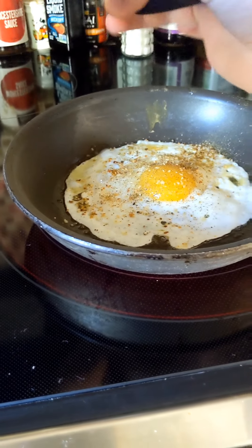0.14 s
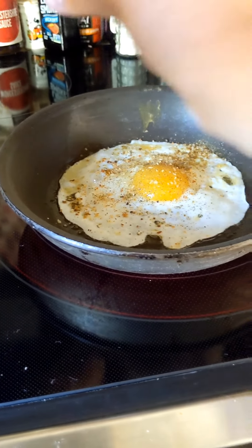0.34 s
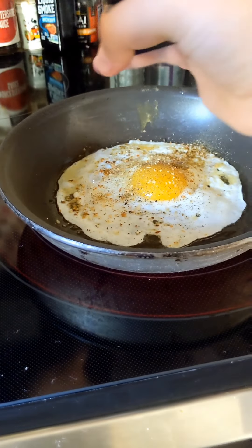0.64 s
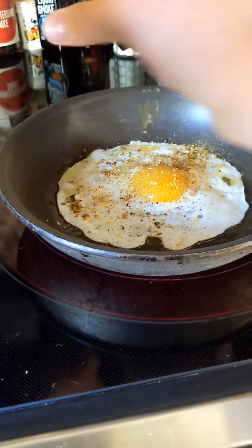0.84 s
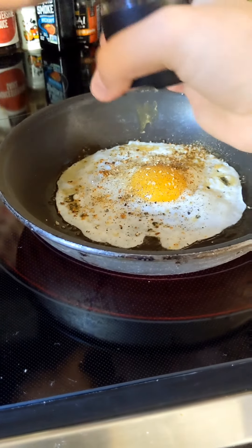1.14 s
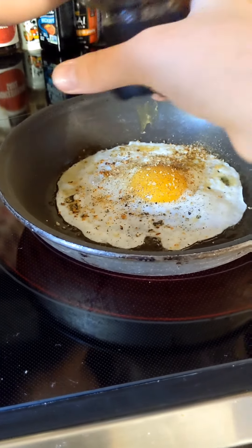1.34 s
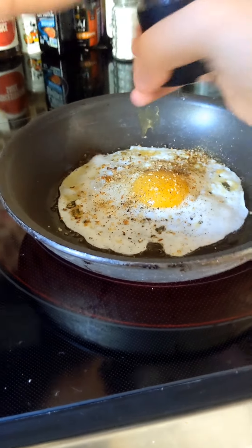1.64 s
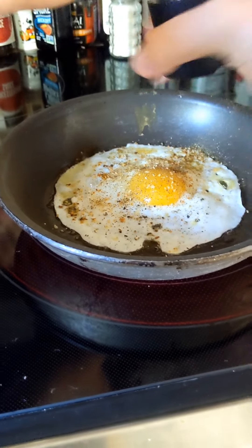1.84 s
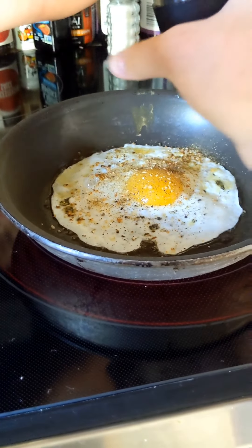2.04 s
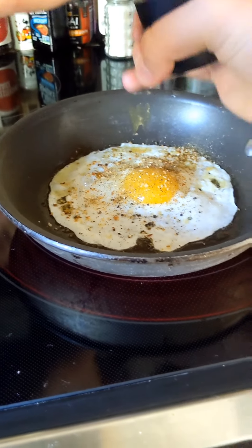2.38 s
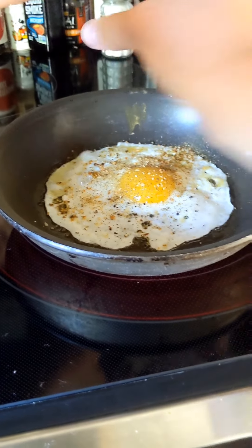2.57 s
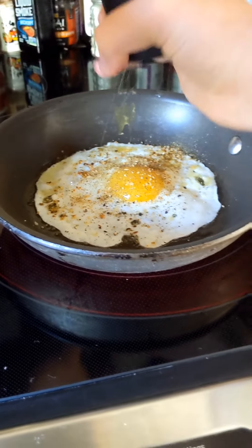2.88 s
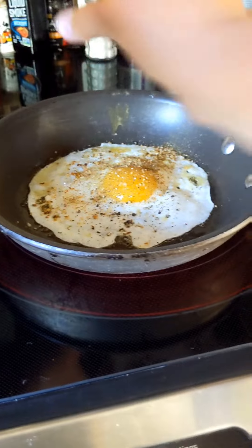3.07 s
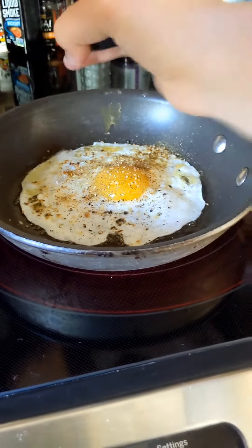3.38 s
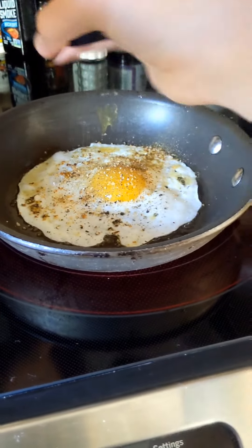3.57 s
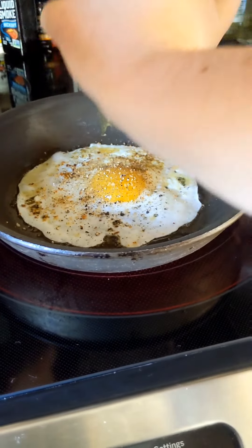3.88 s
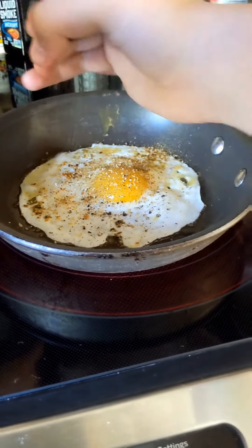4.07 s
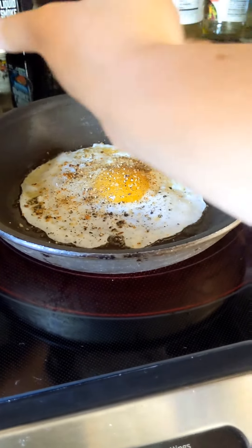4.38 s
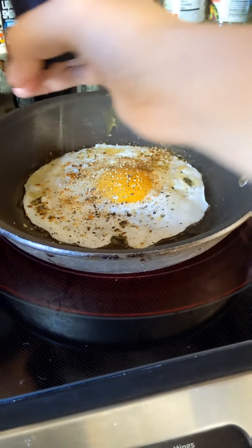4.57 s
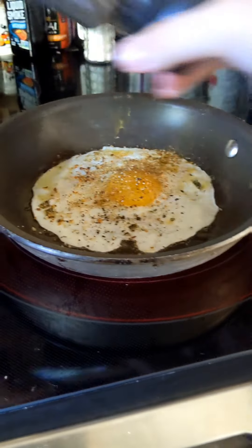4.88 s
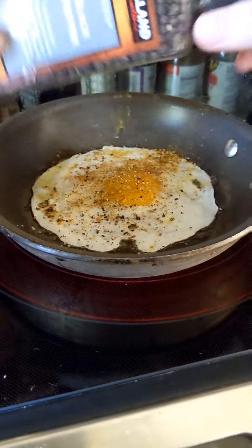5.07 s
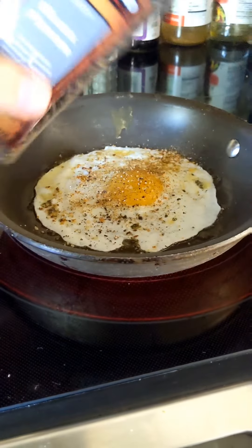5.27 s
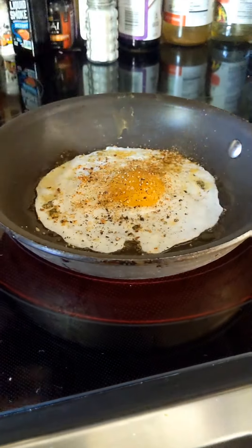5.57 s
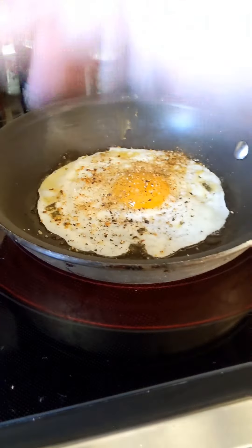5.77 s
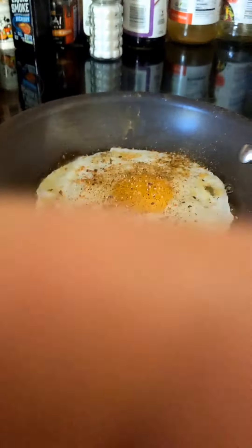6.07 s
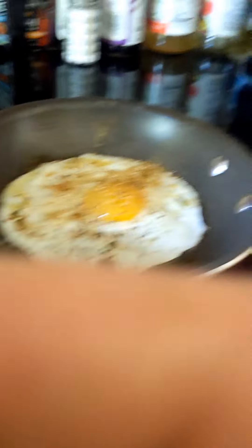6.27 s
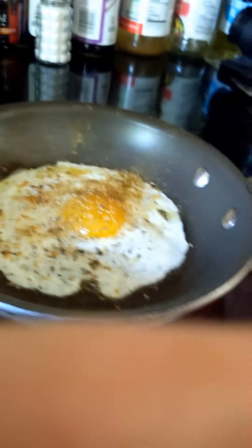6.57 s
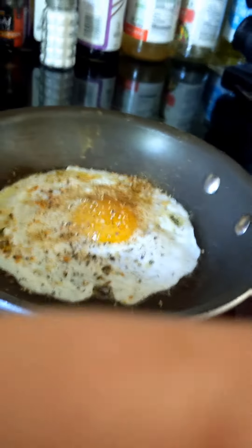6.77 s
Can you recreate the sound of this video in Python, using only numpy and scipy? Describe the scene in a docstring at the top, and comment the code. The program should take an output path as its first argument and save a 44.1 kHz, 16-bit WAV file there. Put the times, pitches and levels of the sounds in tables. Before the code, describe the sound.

A hand pepper mill crunches and cracks in short close twists over a faintly sizzling pan, then peppercorns rattle and things knock on the counter.

```python
"""In a kitchen, a hand pepper mill is twisted over an egg in a pan, close to a phone that listens through two ports.
Corns crack (noise bursts through the body's resonances), crunch (noise and tuned taps) and slide as the mill tips.
A loose steel part clinks as damped modes, and things set down on the counter ring its modes over a low shuffle.
Behind them lie the oil's faint grainy sizzle, low rumble and mains hum.
The right port is muffled and farther from the pan; two sharp snaps come from close beside it."""
import sys
import numpy as np
from scipy import signal
from scipy.fft import rfft, irfft, next_fast_len
from scipy.io import wavfile
from scipy.ndimage import uniform_filter1d

SR = 44100
rng = np.random.default_rng(int(sys.argv[2]) if len(sys.argv) > 2 else 0)


def dump_mix(stems):
    """Bounce the given channels to the path in sys.argv[1] as a 16-bit WAV at rate SR."""
    frames = np.atleast_2d(stems).T  # one column per channel
    limited = np.clip(frames, -1, 1)  # hard clip at full scale
    pcm = np.round(limited * 32767).astype(np.int16)
    wavfile.write(sys.argv[1], SR, pcm)


N = 305418  # length [samples]


def amp(db):
    """Decibels to a linear factor."""
    return 10 ** (np.asarray(db) / 20)


def unit(x):
    """x scaled to rms 1."""
    return x / np.sqrt(np.mean(x ** 2) + 1e-20)


def along(points, hz):
    """Reads (frequency [Hz], value) points on a log frequency axis."""
    f, value = np.transpose(points)
    return np.interp(np.log(hz + 1), np.log(f + 1), value)


def curve(rows):
    """A linear level per sample from (time [s], level [dB]) rows, nearly silent before the first."""
    s, db = np.transpose(rows)
    return amp(np.interp(np.arange(N) / SR, s, db, left=-120))


def add(out, s, sound):
    """Mixes a sound in at time s [s]."""
    part = out[..., max(round(s * SR), 0):][..., :sound.shape[-1]]
    part += sound[..., :part.shape[-1]]


def filtered(x, response):
    """x times a complex response of frequency."""
    m = next_fast_len(x.shape[-1] + 8192)
    spectrum = rfft(x, m) * response(np.fft.rfftfreq(m, 1 / SR))
    return irfft(spectrum, m)[..., :x.shape[-1]]


def coloured(x, spectrum):
    """x shaped by (frequency [Hz], level [dB]) points, rms 1."""
    return unit(filtered(x, lambda hz: amp(along(spectrum, hz))))


def tilted(x, slope_db):
    """A moving brightness: octave bands around 2 kHz get slope_db per octave."""
    steps = np.arange(-3, 4)[:, None]

    def band_weights(hz):
        octave = np.log2(np.clip(hz, 250, 16000) / 2000)
        return np.clip(1 - abs(octave - steps), 0, 1)

    bands = filtered(x, band_weights)
    return np.sum(amp(steps * slope_db) * bands, axis=0)


def patchy(x, depth_db):
    """x with slowly drifting patches of gain over pitch and time."""
    z = signal.stft(x, nperseg=512)[2]
    field = uniform_filter1d(rng.standard_normal(z.shape), size=30, axis=0)
    field = uniform_filter1d(field, size=50, axis=1)
    return signal.istft(z * amp(depth_db * unit(field)), nperseg=512)[1][:N]


def grains(rate, spread_db, hiss, life):
    """Random puffs, rate per second and of varied size, each decaying over life [s], on a bed of noise."""
    size = amp(spread_db * np.minimum(rng.exponential(size=N), 2.5))
    starts = (rng.random(N) < rate / SR) * size
    puffs = signal.lfilter([1], [1, -np.exp(-1 / (life * SR))], starts)
    return unit(puffs * rng.standard_normal(N)) + hiss * rng.standard_normal(N)


def ring(modes, seconds, attack, scatter_db):
    """Damped modes (frequency [Hz], level [dB], t60 [s]) at random phases, their strengths scattered."""
    t = np.arange(int(seconds * SR)) / SR
    total = 0
    for hz, db, t60 in modes:
        decay = amp(db + scatter_db * rng.normal() - 60 * t / t60)
        total = total + decay * np.sin(2 * np.pi * (hz * t + rng.random()))
    return (1 - np.exp(-t / attack)) * total


def taps(modes, rate, spread_db):
    """Tiny knocks at random, each ringing one of the modes; rate per second for each mode."""
    size = amp(spread_db * np.minimum(rng.exponential(size=(len(modes), N)), 2.5))
    blows = (rng.random((len(modes), N)) < rate / SR) * size
    total = 0
    for mode_blows, mode in zip(blows, modes):
        total = total + signal.fftconvolve(mode_blows, ring([mode], 0.02, 0.0003, scatter_db=0))[:N]
    return unit(total)


def resonance(f, centre, width):
    """Band-pass response of one resonance, 1 at its centre [Hz]."""
    return 1j * f * width / (centre * centre - f * f + 1j * f * width)


# what the covered right port lets through: (frequency [Hz], gain [dB])
RIGHT_PORT_GAIN = [(100, -0.5), (300, 1.5), (700, 4), (1100, 4), (2000, -2), (3000, -8), (5000, -14.5),
                   (8000, -25.5), (16000, -31)]


def muffled(x, lag):
    """The covered right port dulls a sound that reaches it lag [s] late."""
    return filtered(x, lambda f: amp(along(RIGHT_PORT_GAIN, f)) * np.exp(-2j * np.pi * f * lag))


# how long the kitchen rings on: (frequency [Hz], t60 [s])
KITCHEN_DECAY = [(200, 0.047), (2000, 0.091), (10000, 0.082)]


def ports(x, lag, wet_db):
    """Each port hears the source and its own diffuse echoes, redrawn every 1/16 s; the right is late and muffled."""
    step, length = SR // 16, SR // 10  # samples between new echo patterns, samples in each
    pieces = np.pad(x, (60, -(N + 60) % step)).reshape(-1, step)  # echoes start 60 samples late
    noise = rng.standard_normal((2, len(pieces), length))
    hz, t, z = signal.stft(noise, SR, nperseg=256)
    decay = amp(-60 * t / along(KITCHEN_DECAY, hz)[:, None])
    tails = signal.istft(z * decay, SR, nperseg=256)[1][..., :length]
    tails = tails / np.linalg.norm(tails, axis=-1, keepdims=True)
    echoes = signal.fftconvolve(pieces[None], tails, axes=2)
    wet = np.zeros((2, N))
    for k in range(len(pieces)):
        add(wet, k * step / SR, echoes[:, k])
    left, right = x + amp(wet_db) * wet
    return np.array([left, muffled(right, lag)])


# the oil in the pan: (time [s], level [dB])
OIL_LEVEL = [(0, -53), (1.5, -53), (3.8, -53), (4.4, -54.5), (4.9, -52), (6.93, -52.5)]
# its colour: (frequency [Hz], level [dB per Hz])
SIZZLE_SPECTRUM = [(100, -9.5), (300, 1), (600, 1), (1300, -2.5), (2000, 2), (4500, 1.5), (7000, -4),
                   (11000, 0.5), (16000, -2.5)]


def sizzle():
    """The oil's fine grains and faint pops from all over the pan, drifting in colour."""
    near, scattered = (
        patchy(coloured(grains(500, spread_db=1.0, hiss=1.26, life=0.00072), SIZZLE_SPECTRUM), depth_db=0.67)
        for _ in range(2))
    pops = coloured(grains(33, spread_db=4.5, hiss=0, life=0.00094), CRUNCH_SPECTRUM)
    near = near + amp(-16.0) * pops
    right = muffled(0.26 * near + 1.17 * scattered, 0.00045)
    return curve(OIL_LEVEL) * np.array([near, right])


# swells and dips of the rumble: (time [s], change [dB], time from its middle to 1/e of it [s])
RUMBLE_JOLTS = [(1.674, 14, 0.069), (5.24, -12, 0.21), (6.353, 13.5, 0.035), (6.845, 6.5, 0.41)]
# colour of the rumble: (frequency [Hz], level [dB per Hz])
RUMBLE_SPECTRUM = [(15, -16), (35, 1), (70, -7), (140, -19), (500, -34)]
RUMBLE_DB = -64.5  # between the swells and dips


def rumble():
    """Low rumble of the hand-held phone: noise partly shared by the ports, with passing swells and dips."""
    common, apart = rng.standard_normal(N), rng.standard_normal((2, N))
    t = np.arange(N) / SR
    jolts_db = sum(db * np.exp(-((t - s) / half) ** 2) for s, db, half in RUMBLE_JOLTS)
    return amp(RUMBLE_DB + jolts_db) * coloured(common + 0.5 * apart, RUMBLE_SPECTRUM)


def mains_hum():
    """A steady 120 Hz sine, alike in both ports."""
    return amp(-70.5) * np.sin(2 * np.pi * 120 * np.arange(N) / SR)


# hands and jars shifting on the counter: (time [s], level [dB])
SHUFFLE_LEVEL = [(5.95, -56.5), (6.6, -57.5), (6.75, -48), (6.82, -43), (6.9, -47.5), (6.93, -70)]
# colour of that shuffle: (frequency [Hz], level [dB per Hz])
SCUFF_SPECTRUM = [(30, -19), (110, -3.5), (240, -5), (600, -7.5), (1200, -15.5), (3000, -45)]
# things set down: (time [s], relative level [dB])
COUNTER_KNOCKS = [(4.596, -36), (6.167, -35), (6.335, -45.5), (6.571, -11), (6.608, -23.5), (6.693, -23.5),
                  (6.752, -29), (6.78, -25.5), (6.797, -21.5), (6.862, -42)]
# modes of the counter top: (frequency [Hz], relative level [dB], t60 [s])
COUNTER_MODES = [(103, -18.5, 0.085), (192, -12, 0.023), (263, -7.5, 0.056), (396, -8.5, 0.033),
                 (588, -7, 0.029), (950, -13.5, 0.018)]


def counter():
    """Soft knocks ring the counter top over a low shuffle."""
    out = curve(SHUFFLE_LEVEL) * coloured(grains(52, spread_db=7.5, hiss=1.0, life=0.0033), SCUFF_SPECTRUM)
    for s, db in COUNTER_KNOCKS:
        add(out, s, amp(db - 3.5) * ring(COUNTER_MODES, 0.12, 0.00077, scatter_db=0.5))
    return out


# clinks: (time [s], level of each of three families of modes [dB] x 3, ring time as a share of t60)
STEEL_CLINKS = [(0.019, -44, -59, -55, 2.2), (.786, -62, -44, -62, 1.06), (1.472, -60, -42.5, -57, 0.72),
                (1.939, -48, -59, -40.5, 0.87), (3.792, -38, -72, -62, 0.82),
                (4.588, -59, -45.5, -44, 0.96), (4.745, -43, -53, -50.5, 1.3),
                (6.046, -36.5, -54, -39, 0.53), (6.108, -49, -62, -43, 0.74),
                (6.341, -32.5, -46, -52, 0.49)]
# modes of the loose steel part, by family: (frequency [Hz], relative level [dB], full t60 [s])
STEEL_FAMILIES = [
    [(968, 1, 0.13), (4460, 3, 0.21), (6905, -8, 0.16), (10800, -10, 0.18), (13770, -15, .18)],
    [(1050, 1, 0.17), (2490, -3, 0.23), (8460, -6, 0.2), (10250, -3, 0.15)],
    [(1620, -9.5, 0.21), (2660, 1, 0.11), (4700, 9, 0.13), (9730, -6, 0.17)],
]


def clinks():
    """The steel part chatters home, so each mode swells and flutters at first; the spot struck favours a family."""
    out = np.zeros(N)
    for s, *levels_db, share in STEEL_CLINKS:
        for level_db, family in zip(levels_db, STEEL_FAMILIES):
            for hz, db, t60 in family:
                tone = ring([(hz, db + level_db, share * t60)], 0.35, 0.01, scatter_db=1)
                chatter = unit(uniform_filter1d(rng.standard_normal(len(tone)), size=120))
                fade = amp(-60 * np.arange(len(tone)) / SR / 0.2)
                add(out, s, tone * (1 + 0.7 * chatter * fade))
    return out


# sharp snaps close to the right port: (time [s], level [dB], level of the 7.5 kHz mode [dB], left port level [dB])
RIGHT_SNAPS = [(1.6222, -0.5, -6, -26), (1.6283, 8.5, -14, -8.5)]
# their ring: (frequency [Hz], relative level [dB], t60 [s])
TICK_MODES = [(1600, 3, 0.0021), (3480, 5.5, 0.0019), (5300, -10, 0.004)]
# their thump, in the right port only: (frequency [Hz], relative level [dB], t60 [s])
THUD_MODES = [(230, -7.5, 0.0056), (104, -35, 0.14)]


def snaps():
    """Beside the right port short modes ring loud and thumpy; the left gets only the tick, weaker and later."""
    out = np.zeros((2, N))
    for s, db, treble_db, left_db in RIGHT_SNAPS:
        treble = [(7500, treble_db, 0.002), (11000, treble_db - 4, 0.0015)]
        tick = ring(TICK_MODES + treble, 0.03, 0.0004, scatter_db=0)
        thud = ring(THUD_MODES, 0.1, 0.0005, scatter_db=0)
        add(out[1], s, amp(db) * tick)
        add(out[1], s, amp(db) * thud)
        add(out[0], s + 0.0007, amp(db + left_db) * tick)
    return out


# corns pouring along the tipped mill: (time of fullest flow [s], level [dB], build-up [s], run-out [s],
# brightness [dB per octave], hollow ring [dB], wall ring [dB])
CORN_POURS = [(5.059, -32, 0.12, 0.14, -0.35, -9.5, -12.5), (5.414, -32.5, 0.33, 0.15, 0.68, -16.5, -9),
              (5.804, -33.5, 0.071, 0.11, 0, -15, -13.5)]
POUR_EDGE_DB = 13  # level lost one build-up or run-out away from the fullest flow
BUILD_SHAPE, RUN_SHAPE = 1.45, 1.7  # how squarely each side bends


def pour_controls():
    """Level and colours of the rattle: each pour builds up, peaks and runs out; colours follow the stronger pour."""
    t = np.arange(N) / SR
    s, db, build, run, *colours = np.transpose(CORN_POURS)[..., None]
    away = np.where(t < s, (s - t) / build, (t - s) / run)
    shape = np.where(t < s, BUILD_SHAPE, RUN_SHAPE)
    power = amp(db - POUR_EDGE_DB * np.minimum(away, 3) ** shape) ** 2
    total = power.sum(0)
    return np.sqrt(total), *((power * c).sum(0) / total for c in colours)


# colour of the sliding corns before the tilt: (frequency [Hz], level [dB per Hz])
RATTLE_SPECTRUM = [(100, -37), (250, -18), (450, -3), (1300, -3), (2200, 0.5), (3500, 3), (6000, -1.5),
                   (10000, -6.5), (16000, -12.5)]
# ring of the mill's hollow: (frequency [Hz], relative level [dB], t60 [s])
HOLLOW_MODES = [(690, 0, .012)]
# ring of its wall: (frequency [Hz], relative level [dB], t60 [s])
WALL_MODES = [(2100, 0, .005)]


def rattle():
    """Corns sliding along the wall of the mill: dense grains, with taps on hollow and wall."""
    level, tilt, hollow_db, wall_db = pour_controls()
    slide = coloured(grains(1400, spread_db=3.0, hiss=0.56, life=0.00044), RATTLE_SPECTRUM)
    hollow = amp(hollow_db) * taps(HOLLOW_MODES, 500, spread_db=6)
    wall = amp(wall_db) * taps(WALL_MODES, 700, spread_db=3.5)
    return level * (tilted(slide, tilt) + hollow + wall)


# twists of the mill: (time [s], length [s], level [dB], fall over the burst [dB], brightness [dB per octave])
MILL_TWISTS = [(0, 0.19, -39.5, 12.5, -2.5), (0.549, 0.084, -34.5, 9, -2), (0.74, 0.1, -55, 12, -8.5),
               (1.044, 0.11, -41, 8, -4), (1.469, 0.057, -48, 12, -6), (1.609, 0.099, -36, 12.5, -7.5),
               (1.704, 0.051, -46, 20, -1.5), (1.938, 0.17, -59.5, 13, -10.5),
               (2.283, 0.11, -33.5, 26, -1.5), (2.783, 0.083, -43, 14, -1.5), (2.836, 0.07, -38, 3, -2),
               (3.063, 0.03, -51, 10, 1), (3.172, 0.072, -56.5, -6, -2.5), (3.381, 0.071, -34.5, 7, -0.5),
               (3.455, 0.084, -35.5, 18, 0.3), (3.768, 0.13, -54.5, 5.5, 0.5),
               (3.967, 0.11, -44.5, -1, -4.5), (4.048, 0.096, -43.5, 10, -3), (4.499, 0.12, -42.5, 9, -3),
               (6.077, 0.092, -53, 6, -2), (6.326, 0.22, -49.5, 15, -1.5), (6.416, 0.18, -55.5, -8.5, -2),
               (6.743, 0.082, -47, 6, -2)]
TWIST_START_S, TWIST_END_S = 0.0052, 0.0052  # first swell and last fade of a twist


def twist_controls():
    """Level and brightness of the crunch: a quick start, a steady fall in dB, a short end."""
    level, slope = np.zeros(N), np.zeros(N)
    for s, length, db, fall_db, slope_db in MILL_TWISTS:
        u = np.linspace(0, 1, round(length * SR))
        swell = np.clip(u * length / TWIST_START_S, 0, 1)
        fade = np.clip((1 - u) * length / TWIST_END_S, 0, 1)
        add(level, s, amp(db - fall_db * u) * fade * swell)
        slope[round(s * SR):] = slope_db
    return level, slope


# colour of the crunching before the tilt: (frequency [Hz], level [dB per Hz])
CRUNCH_SPECTRUM = [(60, -10.5), (200, -14), (450, -6.5), (1300, -15), (2200, -5.5), (2600, 1.5),
                   (3600, 5.5), (5000, 4.5), (8000, -1), (16000, -7)]
# what crushed bits ring: (frequency [Hz], relative level [dB], t60 [s])
BURR_MODES = [(620, -4.5, 0.0089), (1056, -1.5, 0.0093), (1600, 2, 0.0064), (2126, 2, 0.0059)]


def crunch():
    """Corns crushed between the burrs: grainy noise and tuned taps, the taps weaker as brightness rises."""
    level, tilt = twist_controls()
    grit = tilted(coloured(grains(350, spread_db=6, hiss=0.51, life=0.0028), CRUNCH_SPECTRUM), tilt)
    bits = amp(-6.0 - 0.95 * tilt) * taps(BURR_MODES, 110, spread_db=4.0)
    return level * (grit + bits)


# resonances of the plastic body: (frequency [Hz], width [Hz], relative level [dB])
MILL_BODY = [(458, 137, 1), (1500, 1580, 5), (1967, 1080, 9), (3940, 4860, 2.5)]
BODY_TOP_HZ = 8600  # the plastic passes little above this in a snap that is not thumpy
DULL = 0.6  # a thumpy snap loses treble: dB of its top frequency per dB of colour
FAVOUR, FAVOUR_Q = 1.87, 4.5  # lift and sharpness of the body's answer around the snap's pitch


def body_response(f, colour_db, hz):
    """The mill body's resonances, dulled for thumpy snaps and lifted around the pitch of the spot that snaps."""
    body = sum((-1) ** k * amp(db) * resonance(f, centre, width)
               for k, (centre, width, db) in enumerate(MILL_BODY))
    top_hz = BODY_TOP_HZ * amp(DULL * min(colour_db, 0))
    return body / (1 + 1j * f / top_hz) ** 2 * (1 + FAVOUR * resonance(f, hz, hz / FAVOUR_Q))


def spit_response(f):
    """A broad treble band: a steep rise up to 6.5 kHz and a gentler fall from 9 kHz."""
    return (1j * f / 6500 / (1 + 1j * f / 6500)) ** 3 / (1 + 1j * f / 9000) ** 2


def thump_response(f):
    """A broad low resonance."""
    return resonance(f, 350, 400) / (1 + 1j * f / 700)


# single corns snapping: (time [s], relative level [dB],
# colour [dB]: raises or lowers the treble spit, and below 0 adds thump, strongest pitch [Hz])
CORN_CRACKS = [(0.068, -25, -13, 1680), (.109, -34, -24, 1500), (0.416, -45, -22, 800),
               (0.486, -43, 26, 2100), (0.13, -41, 1, 1500), (0.564, -29, -21.5, 1600),
               (0.754, -32.5, -12, 1740), (.986, -40, 18, 1790), (1.051, -33, 0, 2010),
               (1.073, -27.5, -13, 1380), (1.137, -35, -30, 1860), (1.638, -44, -16, 1600),
               (1.695, -24.5, 7.5, 1300), (2.009, -38.5, -21, 680), (2.195, -41.5, -14.5, 620),
               (2.3011, -11.5, 5.5, 1070), (2.366, -25, -5.5, 1880), (2.473, -31, 24, 5650),
               (2.536, -45.5, -24, 900), (2.792, -40, -16, 2010), (2.8374, -6, 1.5, 1670),
               (3.051, -31, 6, 3920), (3.084, -35, -12, 2900), (3.166, -36.5, 5, 3660),
               (3.299, -37.5, 2, 1930), (3.394, -20.5, 19.5, 2300), (3.398, -22, -2, 2100),
               (3.4615, -15, 11, 2070), (3.559, -41.5, -16.5, 700), (3.772, -37.5, -1, 3060),
               (3.87, -38, -30.5, 660), (3.97, -39, 8, 1620), (3.981, -28, 9.5, 1640),
               (4.039, -29, 9, 2000), (4.0677, -27.5, -27, 610), (4.276, -42, -19, 890),
               (4.293, -43.5, -13, 1010), (4.392, -32, -10, 3480), (4.499, -50, -13, 1700),
               (4.686, -50, 26, 4960), (4.775, -38, -23.5, 786), (4.816, -36, 19, 1710),
               (4.922, -30, -1, 2000), (4.934, -28, 6, 1850), (4.985, -18, 0, 1820), (5.415, -22, 4, 2100),
               (5.632, -28.5, 9, 2630), (5.75, -25, 13, 2400), (5.787, -18, 11, 4660),
               (5.945, -31.5, 0, 2600), (6.238, -39, 19.5, 1600), (6.259, -33.5, -2, 1710),
               (6.452, -30.5, 7, 5010), (6.497, -38.5, -26, 1900)]
BODY_DB, SPIT_DB, THUMP_DB = 5, -12, -29.5  # peaks of the three parts at colour 0, over the snap's level
BREAK = 13  # size of the first break over the splintering noise


def cracks():
    """Each snap is a burst of a millisecond or two, then splinters: it rings the body, spits treble and thumps."""
    out, t = np.zeros(N), np.arange(2048) / SR
    for s, db, colour_db, hz in CORN_CRACKS:
        noise = (1 - np.exp(-t / 0.0006)) * rng.standard_normal(len(t))
        burst = amp(-60 * t / 0.002) * noise
        splinters = amp(-60 * t / 0.012) * noise
        split = burst + BREAK * (np.arange(len(t)) == 12)  # a one-sample break
        body = filtered(split + 0.033 * splinters, lambda f: body_response(f, colour_db, hz))
        spit = filtered(burst + 0.22 * splinters, spit_response)
        thump = filtered(split, thump_response)
        gains = amp(db + np.array([BODY_DB, SPIT_DB + colour_db, THUMP_DB + max(-colour_db, 0)]))
        add(out, s, sum(g * part / abs(part).max() for g, part in zip(gains, (body, spit, thump))))
    return out


def scene():
    """Sets each source at its own lag to the right port [s] and its own share of kitchen echo."""
    background = sizzle() + rumble() + mains_hum()
    steel = ports(clinks(), 0.0005, wet_db=-15)
    corns = ports(rattle() + crunch(), 0.00046, wet_db=-2.5)
    hits = ports(counter() + cracks(), 0.000545, wet_db=-4.5)
    return background + steel + snaps() + corns + hits


TOP_HZ = 15700  # band limit of the phone


def record(dry):
    """The loudest peaks are softly clipped, and the phone keeps nothing above its band limit."""
    clipped = dry / (1 + abs(dry / 0.75) ** 4) ** (1 / 4)
    return filtered(clipped, lambda hz: hz < TOP_HZ)


dry = scene()
out = record(dry)
dump_mix(out)
```